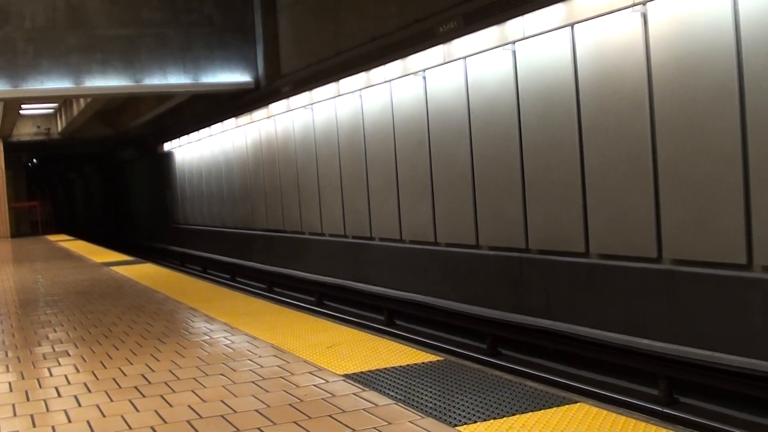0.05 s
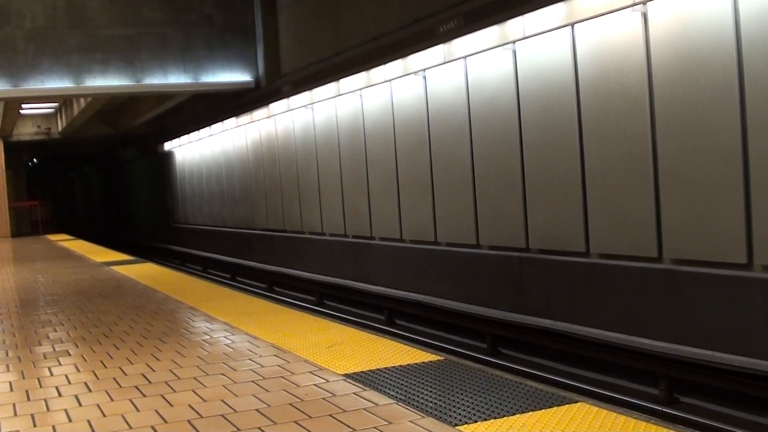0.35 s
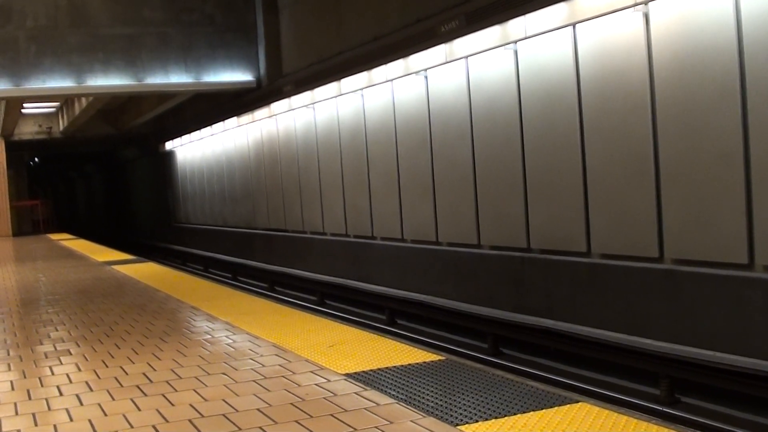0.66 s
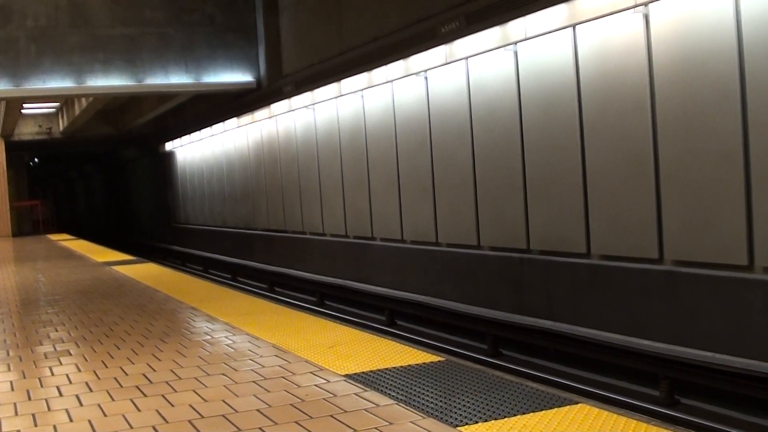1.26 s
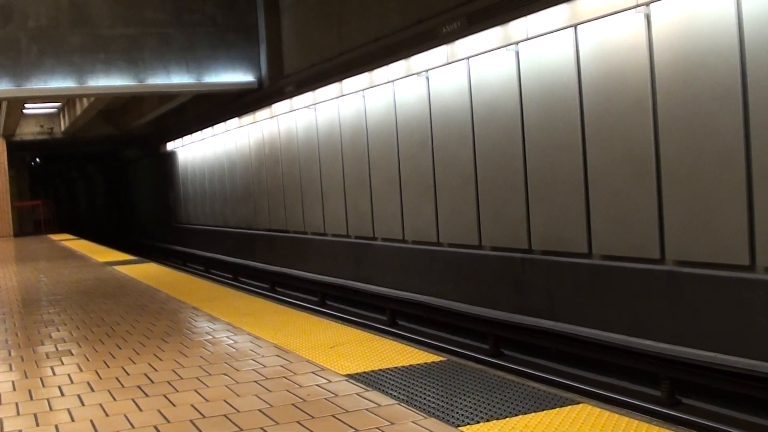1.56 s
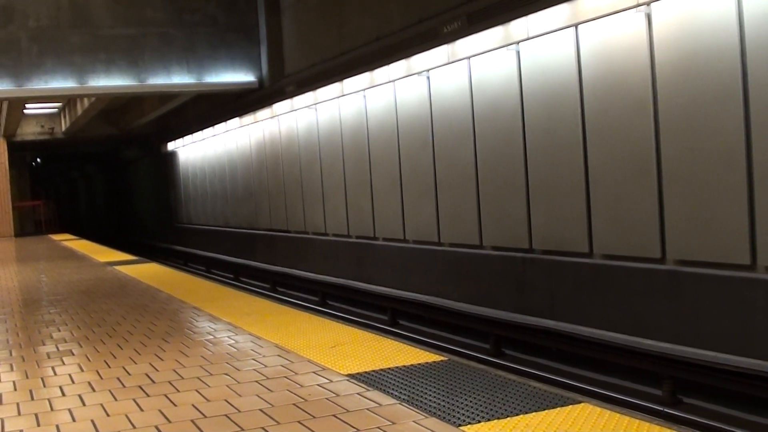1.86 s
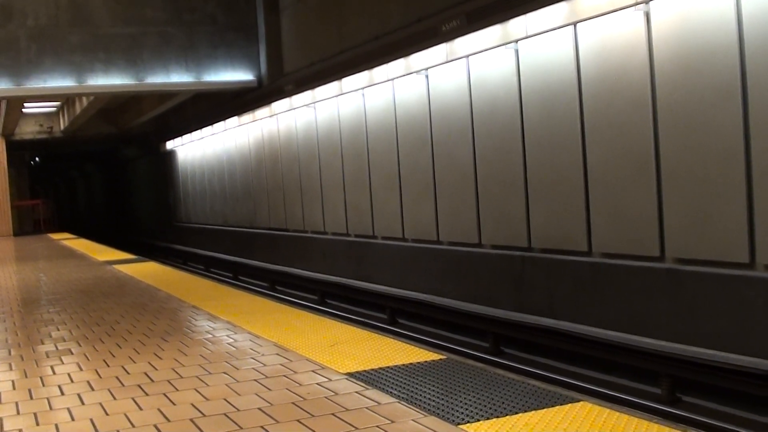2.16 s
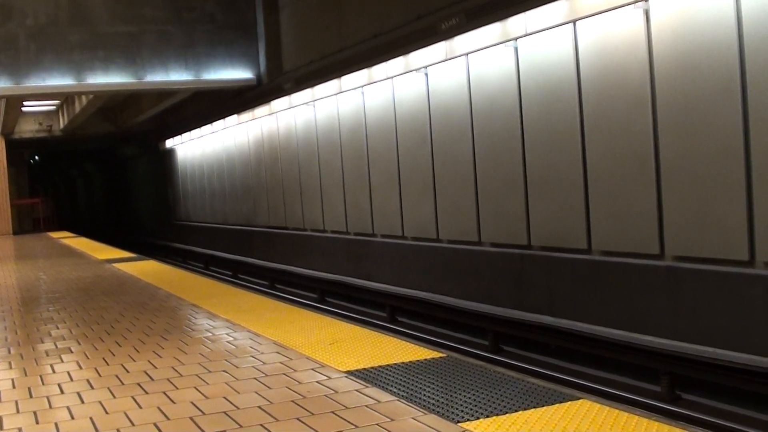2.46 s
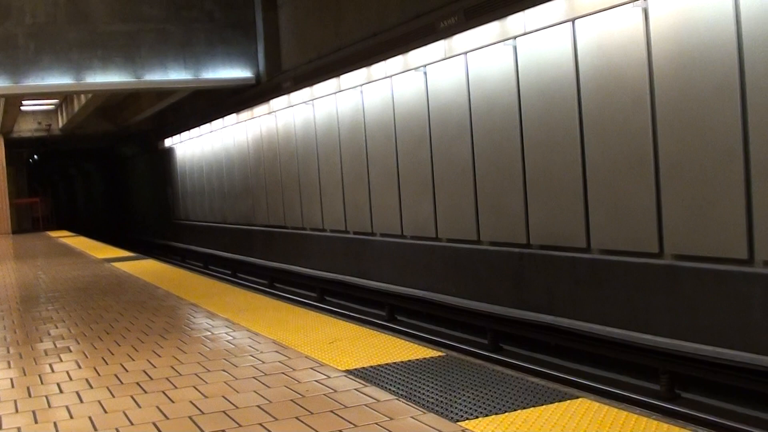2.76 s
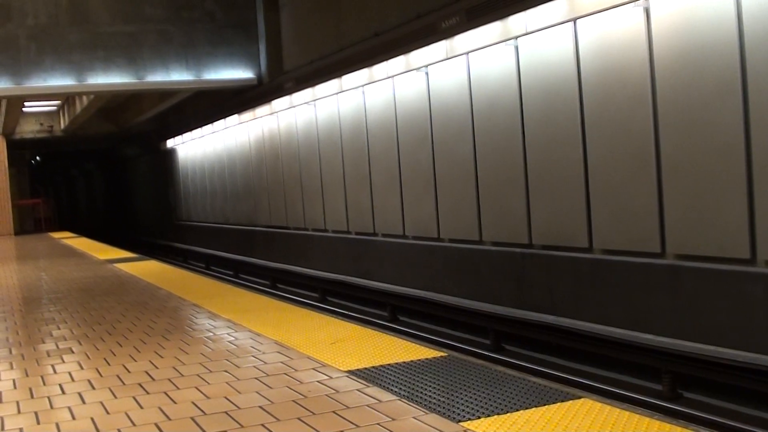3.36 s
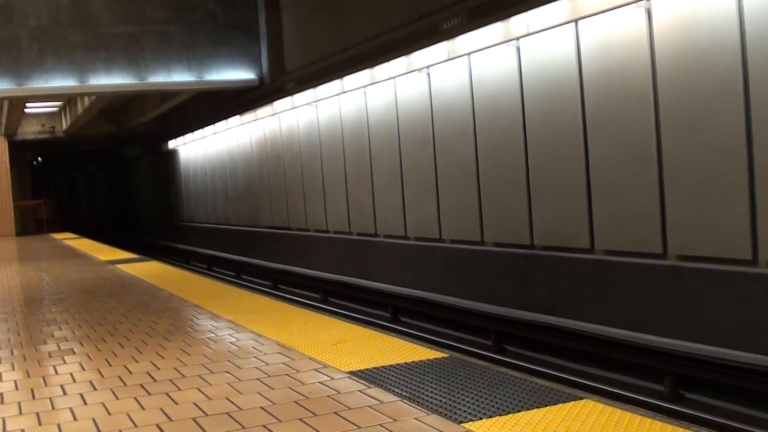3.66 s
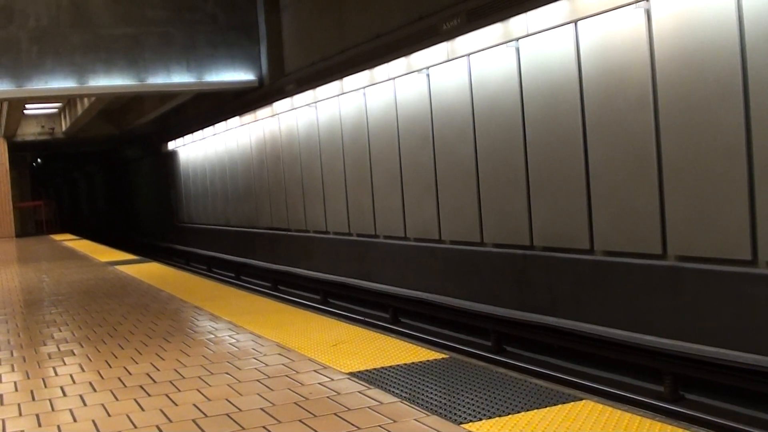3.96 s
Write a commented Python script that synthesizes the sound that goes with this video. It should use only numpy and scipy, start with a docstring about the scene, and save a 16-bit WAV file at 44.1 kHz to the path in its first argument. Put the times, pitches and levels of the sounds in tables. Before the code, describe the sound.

A far-off train rumbles in the tunnel of an underground station, over humming machinery. Wheels hiss, clack lightly and squeak twice, while the low throb gives way to a higher drone. Weak ticks reach the microphone on the platform.

```python
"""An empty underground platform. The tunnel carries the roar of a distant train: its low, throbbing
drone and wheel hiss ebb while a higher drone grows. Wheels clack over joints and squeak on the rail.
Machinery hums in the hall. A thin sizzle and weak ticks lie on top.
A close pair of microphone ports hears it through a fast limiter."""
import sys
import numpy as np
from scipy import signal
from scipy.fft import rfft, irfft
from scipy.io import wavfile

SR = 44100
rng = np.random.default_rng(int(sys.argv[2]) if len(sys.argv) > 2 else 0)


def output_pcm(signal):
    """Save a mono or channel-first signal as 16-bit PCM at the path in sys.argv[1].

    Samples are clipped to [-1, 1] before scaling.
    """
    pcm = np.clip(np.atleast_2d(signal).T, -1, 1) * 32767
    wavfile.write(sys.argv[1], SR, np.round(pcm).astype(np.int16))


N = 176400
TIME_S, FREQ_HZ = np.arange(N) / SR, np.fft.rfftfreq(N, 1 / SR)

# Noise spectra. Each row: frequency in Hz, relative density in dB.
ROAR_SPECTRUM = [(20, -33), (40, -40.5), (54, -27), (70, -37.5), (100, -25), (140, -22.5), (175, -18.5),
                 (230, -18.5), (275, -8), (350, -5.5), (415, 0), (480, 0), (545, -5), (610, 0), (660, -1.5),
                 (700, -9.5), (820, -10.5), (920, -14), (1000, -19), (1250, -20.5), (1600, -27.5),
                 (2200, -29), (2700, -36), (4000, -39.5), (5200, -50), (8000, -68), (11000, -84),
                 (16000, -74)]
LOW_DRONE_SPECTRUM = [(120, -35.5), (172, -6), (200, -17), (235, -5.5), (275, 4.5), (320, 8), (370, -0.5),
                      (500, -67)]
MID_DRONE_SPECTRUM = [(300, -41), (375, -13.5), (410, -1.5), (440, 1), (472, -0.5), (505, -11.5),
                      (700, -68.5)]
HISS_SPECTRUM = [(500, -14.5), (1000, -4.5), (1500, 4.5), (2150, -1), (2700, -8), (3400, -7), (4200, -10),
                 (5100, -22), (6000, -27), (7200, -38.5), (8500, -47.5), (11000, -74.5)]
HISS_TOP_SPECTRUM = [(3500, -22.5), (5000, -2.5), (6000, 4), (7200, -0.5), (8500, -12.5), (11000, -49.5)]
CLACK_SPECTRUM = [(500, -22.5), (1100, 1), (2000, 2.5), (3000, -1), (4300, -2.5), (5300, -13), (7400, -24),
                  (9000, -36), (16000, -60)]
SIZZLE_SPECTRUM = [(9000, -54.5), (11950, -27), (12270, -10.5), (12400, -4), (12820, 1.5), (13080, -5.5),
                   (13350, -18), (14200, -24.5), (14780, -7), (15700, -11.5)]

# Envelopes. Each row: time in seconds, dry level in dB.
LOW_DRONE_ENVELOPE = [(0, -21), (.7, -20.5), (1.1, -22), (1.3, -13), (1.9, -21.5), (2.3, -19.5),
                      (2.7, -30.5), (2.95, -29), (3.1, -17), (3.35, -31), (4, -41.5)]
MID_DRONE_ENVELOPE = [(0, -33), (2.2, -31), (2.7, -23.5), (3.2, -18.5), (3.6, -15), (4, -18.5)]
HISS_ENVELOPE = [(0, -31.5), (.4, -30.5), (.7, -28.5), (1.05, -35), (1.3, -30.5), (1.52, -25.5),
                 (1.68, -30.5), (1.95, -32), (2.35, -40), (2.85, -37.5), (3.45, -34), (3.7, -43), (4, -39)]
HISS_TOP_ENVELOPE = [(0, -57), (.3, -55), (.8, -58.5), (1.05, -61.5), (1.55, -56), (2, -64.5), (4, -65.5)]
SIZZLE_ENVELOPE = [(0, -64.5), (.42, -62), (.52, -57), (.7, -63), (1.15, -63.5), (2, -68), (4, -67.5)]

# Machinery hum. Each row: pitch in Hz, rms wander in Hz, envelope as above.
MACHINE_TONES = [(410.8, 1.99, [(0, -30), (1, -22.5), (2, -22), (2.5, -24.5), (4, -20.5)]),
                 (478, 1.7, [(0, -31.5), (2.4, -34), (2.75, -18.5), (3.1, -28), (4, -27)]),
                 (644, 1.2, [(0, -27.5), (.25, -19.5), (.5, -16.5), (.75, -26.5), (1, -19.5), (1.25, -35),
                 (2.3, -33.5), (4, -34)]), (3223, 5, [(0, -56), (4, -51.5)])]
# Wheels over joints. Each row: start in seconds, dry level in dB.
JOINT_CLACKS = [(0.502, -32.5), (.565, -41), (.738, -33.5), (1.529, -25), (2.83, -36.5), (3.145, -35)]
# Wheel squeaks. Each row: centre in seconds, sigma in seconds, pitch in Hz, dry level in dB.
RAIL_SQUEAKS = [(1.76, .025, 3720, -42), (2.93, .06, 3235, -46)]
# Spurts of sizzle. Each row: centre in seconds, sigma in seconds, dry level in dB.
SIZZLE_SPURTS = [(.082, .007, -51), (.277, 0.01, -51), (1.165, 0.0069, -63)]

# Likeness of the two ports. Each row: frequency in Hz, correlation from 0 to 1.
PORT_CORRELATION = [(60, .98), (250, .985), (420, .97), (700, .93), (1350, .96), (2500, .97), (5000, .975),
                    (13000, .985)]
# Phase between ports. Each row: frequency in Hz, left lead in radians.
PORT_LEAD = [(30, 0), (120, .25), (260, .42), (450, .44), (620, .58), (880, .13), (1200, .22), (2500, .12),
             (5000, 0)]
# Balance of the ports. Each row: frequency in Hz, left minus right in dB.
PORT_BALANCE = [(60, 1), (380, 1.1), (490, 1.5), (740, -.8), (1050, .7), (2000, 1), (4500, .9), (8000, -.4)]


def tunnel_roar(roar_db=-12, throb_hz=9.2, throb_db=3.3):
    """A distant train: steady roar and two drones that trade places; the lower one throbs."""
    roar = amp(roar_db) * stereo_noise(ROAR_SPECTRUM)
    throb = amp(throb_db * np.sin(2 * np.pi * (throb_hz * TIME_S + rng.random())))
    low_drone = throb * envelope(LOW_DRONE_ENVELOPE) * stereo_noise(LOW_DRONE_SPECTRUM)
    mid_drone = envelope(MID_DRONE_ENVELOPE) * stereo_noise(MID_DRONE_SPECTRUM)
    return roar + low_drone + mid_drone


def machinery_hum(waver_db=1.5, waver_hz=6):
    """Narrow tones swell and waver in the long hall."""
    hum = np.zeros(N)
    for pitch_hz, wander_hz, swell in MACHINE_TONES:
        waver = amp(waver_db * drift(waver_hz))
        hum += envelope(swell) * waver * tone(pitch_hz, wander_hz)
    return np.array([hum, irfft(rfft(hum) * right_port_response(), N)])


def wheel_hiss():
    """Far wheels on rails: a surging hiss whose bright top dies away sooner."""
    body = envelope(HISS_ENVELOPE) * stereo_noise(HISS_SPECTRUM)
    top = envelope(HISS_TOP_ENVELOPE) * stereo_noise(HISS_TOP_SPECTRUM)
    return body + top


def wheel_clacks(rise_s=0.014, decay_s=0.034):
    """Wheels knock over joints; the tunnel smears each knock into a noise burst."""
    bursts = np.zeros(N)
    for start_s, level_db in JOINT_CLACKS:
        age_s = TIME_S - start_s
        rise = np.clip(age_s / rise_s, 0, 1)
        decay = np.exp(-np.maximum(age_s - rise_s, 0) / decay_s)
        bursts += amp(level_db) * rise * decay
    return bursts * stereo_noise(CLACK_SPECTRUM)


def wheel_squeaks():
    """A wheel rings briefly against the rail."""
    return sum(amp(level_db) * gaussian(TIME_S - centre_s, sigma_s) * tone(pitch_hz, wander_hz=20)
               for centre_s, sigma_s, pitch_hz, level_db in RAIL_SQUEAKS)


def sizzle(flicker_db=-0.2, flicker_hz=35):
    """Very high hiss with a slight flicker and a few short spurts."""
    spurts = sum(amp(level_db) * gaussian(TIME_S - centre_s, sigma_s)
                 for centre_s, sigma_s, level_db in SIZZLE_SPURTS)
    flicker = amp(flicker_db * drift(flicker_hz))
    return (envelope(SIZZLE_ENVELOPE) * flicker + spurts) * stereo_noise(SIZZLE_SPECTRUM)


def ticks(rate_per_s=32, max_db=-34, spread_db=10, cutoff_hz=9000):
    """Weak dry ticks: low-passed impulses at random moments."""
    impulses = (rng.random(N) < rate_per_s / SR) * rng.choice([-1, 1], N)
    gains = amp(max_db - spread_db * rng.random(N))
    return irfft(rfft(impulses * gains) / (1 + 1j * FREQ_HZ / cutoff_hz), N)


def amp(db):
    """Decibels to gain."""
    return 10 ** (np.asarray(db) / 20)


def unit_rms(x):
    """Scales to rms 1."""
    return x / np.sqrt(np.mean(x ** 2) + 1e-30)


def gaussian(offset_s, sigma_s):
    """Bell curve, peak 1."""
    return np.exp(-0.5 * (offset_s / sigma_s) ** 2)


def per_bin(table):
    """A frequency table interpolated on a log axis."""
    hz, values = np.transpose(table)
    return np.interp(np.log(FREQ_HZ + 1), np.log(hz + 1), values)


def envelope(table):
    """A table of dB over time, as gain."""
    return amp(np.interp(TIME_S, *np.transpose(table)))


def drift(cutoff_hz):
    """Slow random motion, rms 1."""
    white = rfft(rng.standard_normal(N)) * (FREQ_HZ > 0)
    return unit_rms(irfft(white / (1 + (FREQ_HZ / cutoff_hz) ** 4), N))


def tone(pitch_hz, wander_hz):
    """Sine with wandering pitch, rms 1."""
    cycles = np.cumsum(pitch_hz + wander_hz * drift(cutoff_hz=8.1)) / SR
    return np.sqrt(2) * np.sin(2 * np.pi * (cycles + rng.random()))


def right_port_response():
    """Phase and gain of the right port relative to the left."""
    return np.exp(-1j * per_bin(PORT_LEAD)) / amp(per_bin(PORT_BALANCE))


def stereo_noise(spectrum):
    """Shaped noise at the two ports, rms 1."""
    left, independent = rfft(rng.standard_normal((2, N)))
    correlation = per_bin(PORT_CORRELATION)
    right = (correlation * left + np.sqrt(1 - correlation ** 2) * independent) * right_port_response()
    return unit_rms(irfft(np.array([left, right]) * amp(per_bin(spectrum)), N))


def scene():
    """Everything heard on the platform."""
    return (tunnel_roar() + machinery_hum() + wheel_hiss() + wheel_clacks() + wheel_squeaks()
            + sizzle() + ticks())


def record(dry):
    """A fast limiter holds down the crests of the roar; make-up gain and a low-pass follow."""
    threshold_db, attack_s, release_db_per_s = -8.5, 0.00039, 170
    makeup_db, cutoff_hz = 3.5, 15780
    over_db = np.maximum(20 * np.log10(abs(dry).max(0) + 1e-9) - threshold_db, 0)
    release_db = TIME_S * release_db_per_s
    held_db = np.maximum.accumulate(over_db + release_db) - release_db
    window = gaussian(np.arange(-512, 513) / SR, attack_s)
    reduction_db = signal.oaconvolve(held_db, window / window.sum(), "same")
    limited = dry * amp(makeup_db - reduction_db)
    lowpass = signal.firwin(801, cutoff_hz, window=("kaiser", 9), fs=SR)
    return signal.oaconvolve(limited, lowpass[None], "same")


dry = scene()
out = record(dry)
output_pcm(out)
```